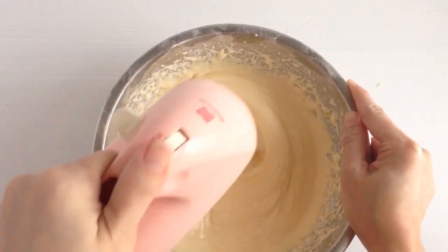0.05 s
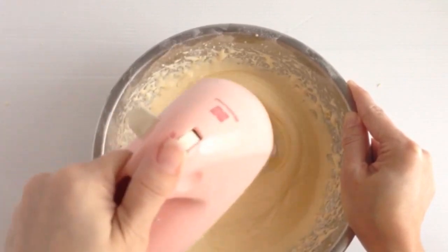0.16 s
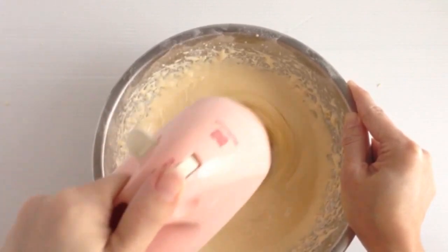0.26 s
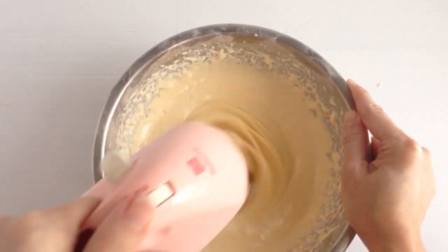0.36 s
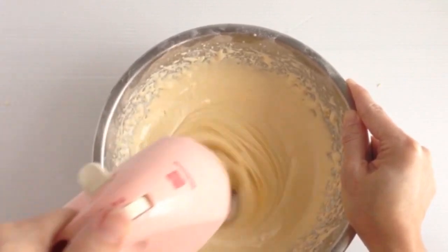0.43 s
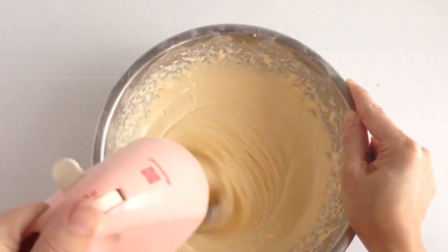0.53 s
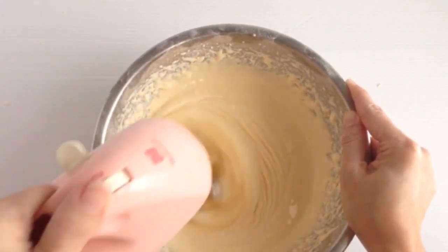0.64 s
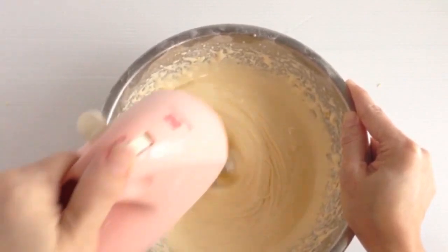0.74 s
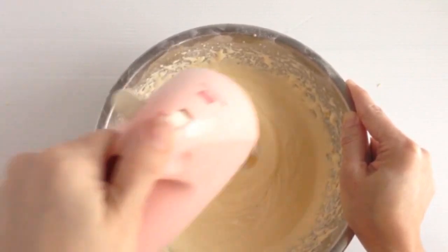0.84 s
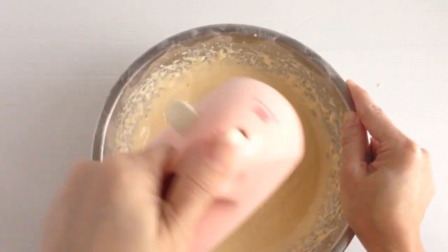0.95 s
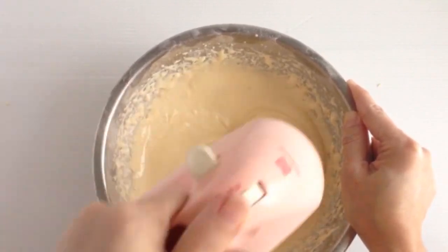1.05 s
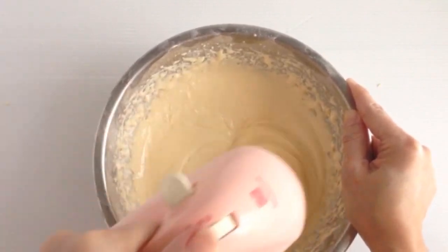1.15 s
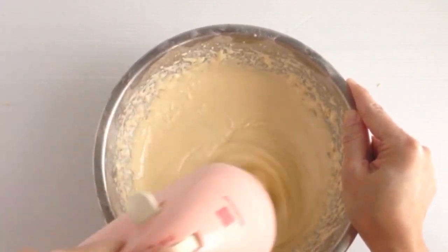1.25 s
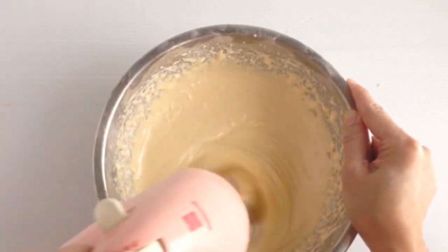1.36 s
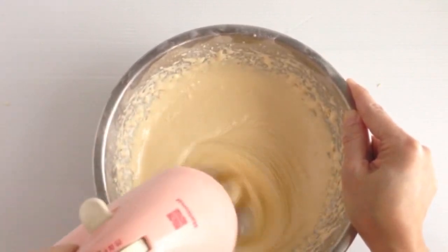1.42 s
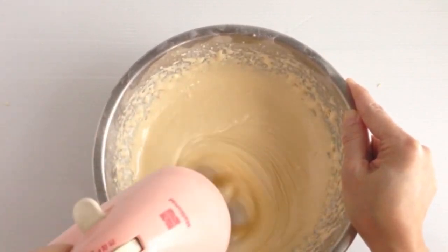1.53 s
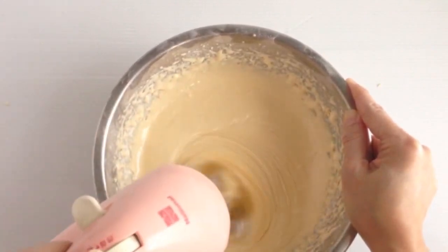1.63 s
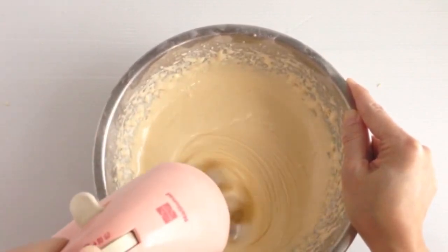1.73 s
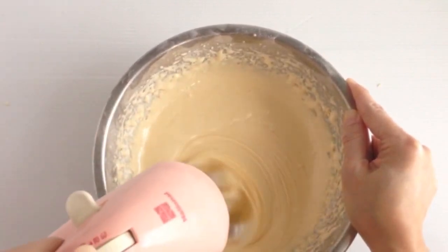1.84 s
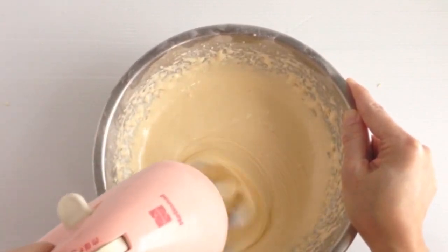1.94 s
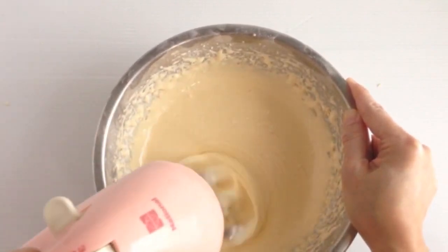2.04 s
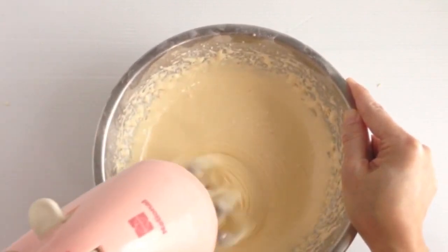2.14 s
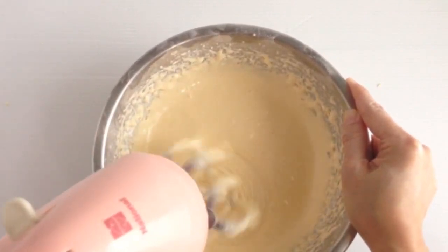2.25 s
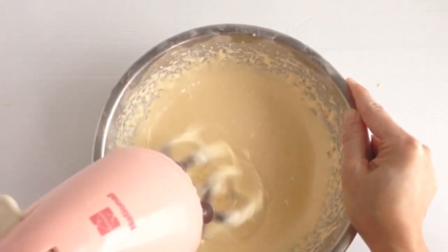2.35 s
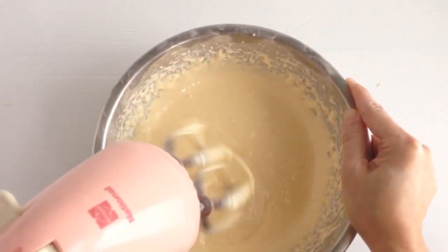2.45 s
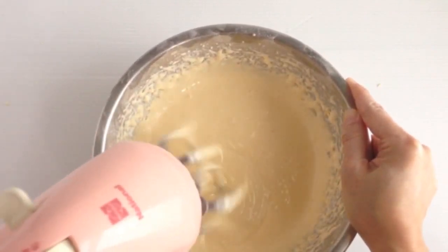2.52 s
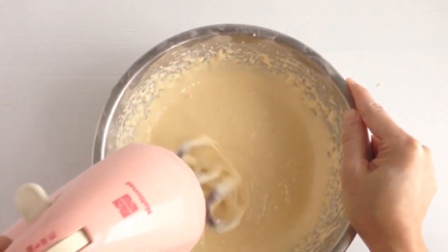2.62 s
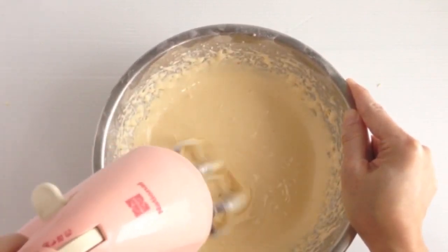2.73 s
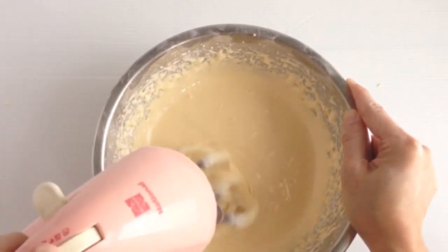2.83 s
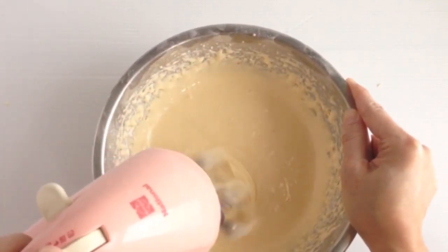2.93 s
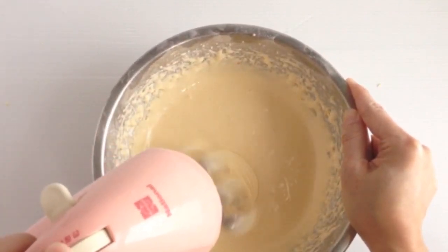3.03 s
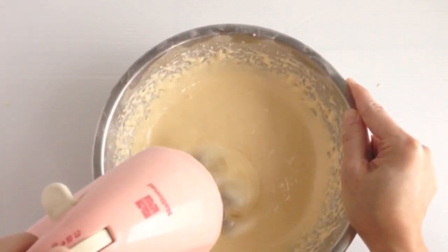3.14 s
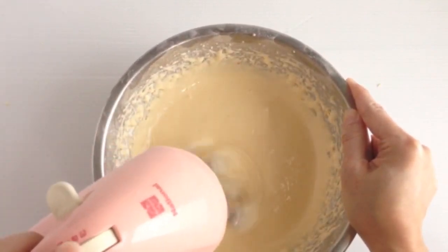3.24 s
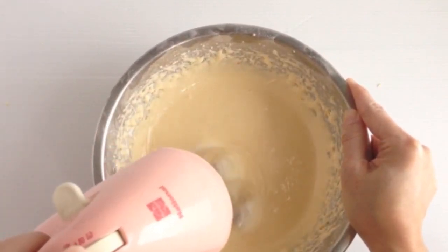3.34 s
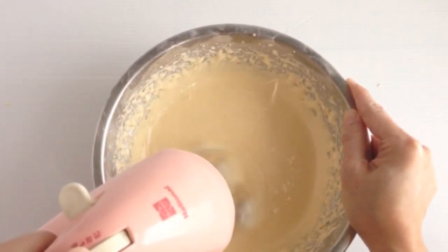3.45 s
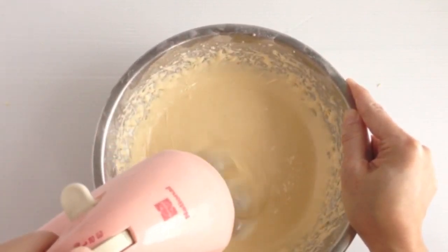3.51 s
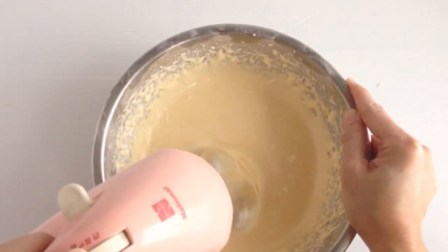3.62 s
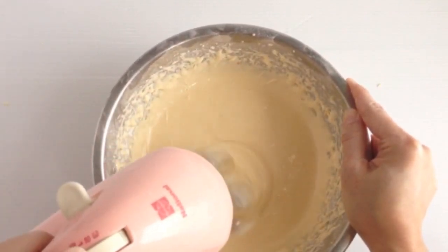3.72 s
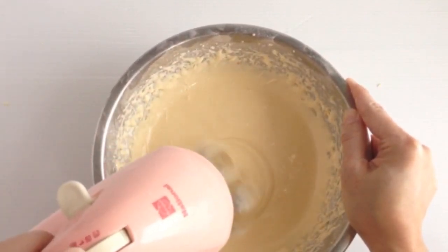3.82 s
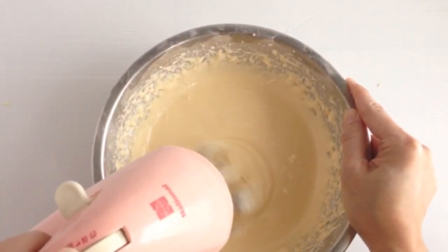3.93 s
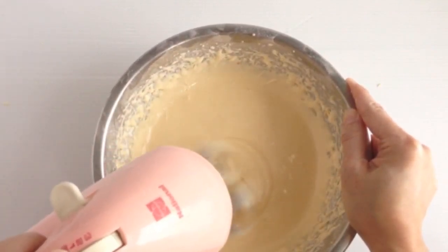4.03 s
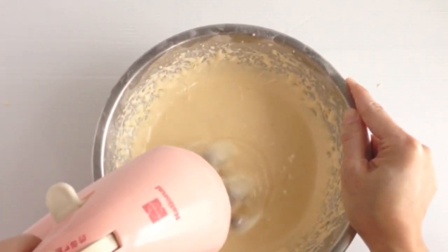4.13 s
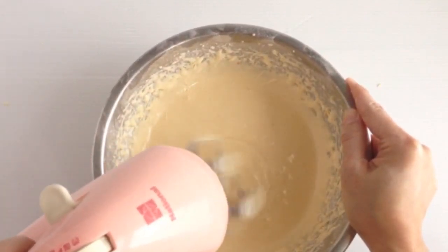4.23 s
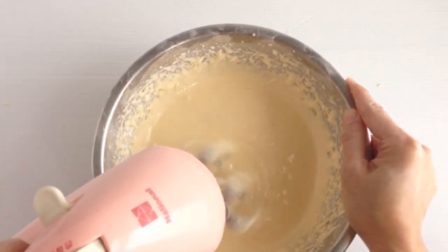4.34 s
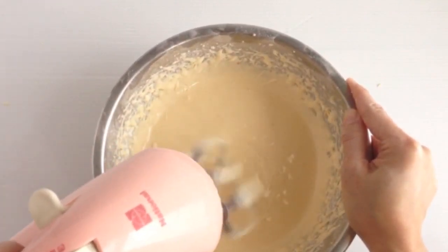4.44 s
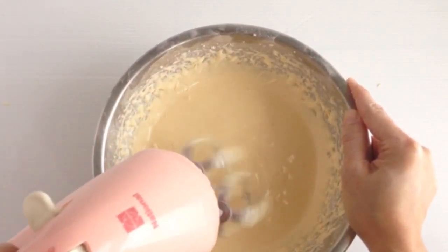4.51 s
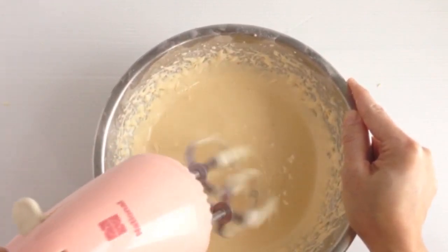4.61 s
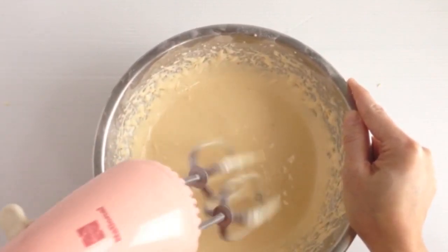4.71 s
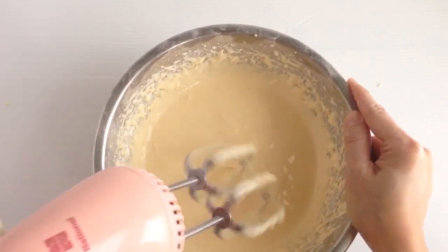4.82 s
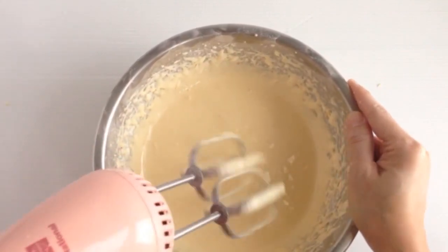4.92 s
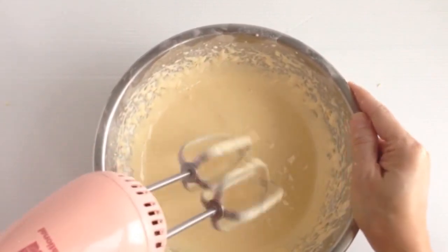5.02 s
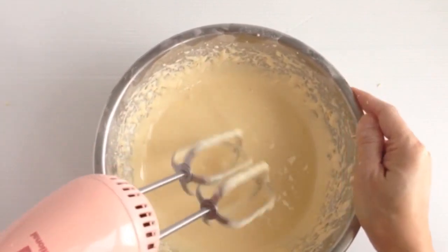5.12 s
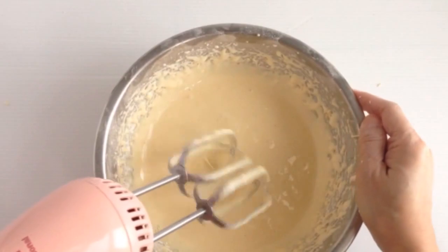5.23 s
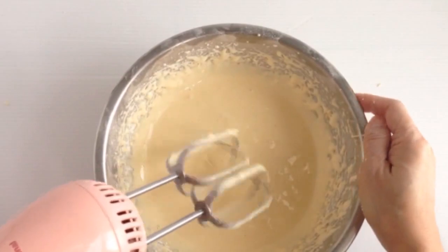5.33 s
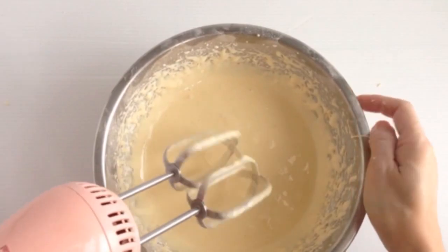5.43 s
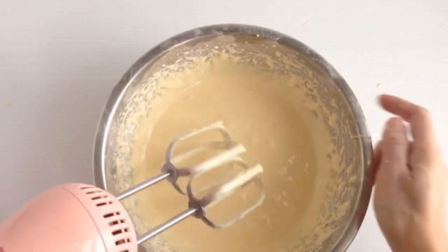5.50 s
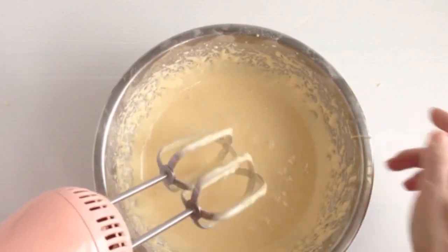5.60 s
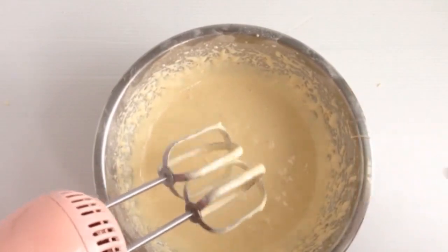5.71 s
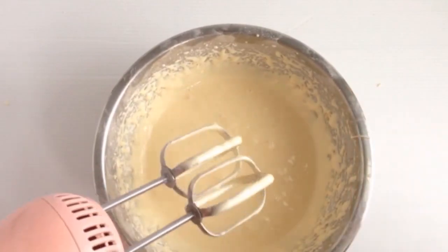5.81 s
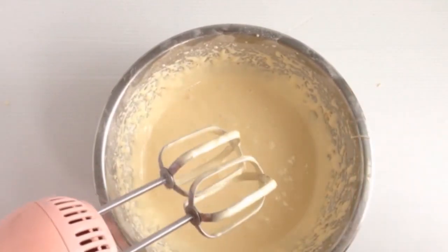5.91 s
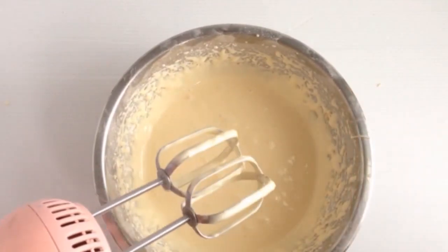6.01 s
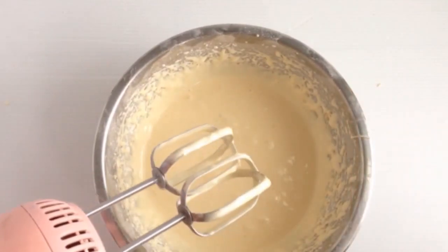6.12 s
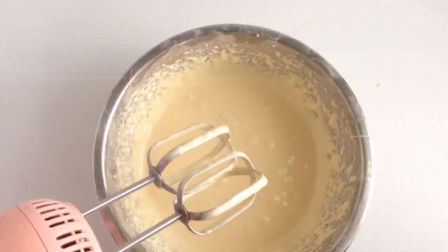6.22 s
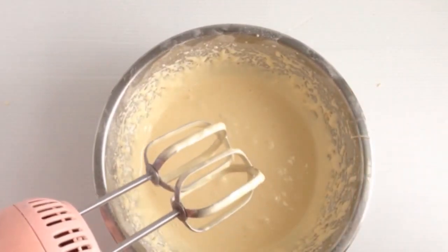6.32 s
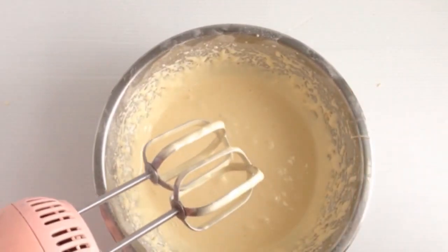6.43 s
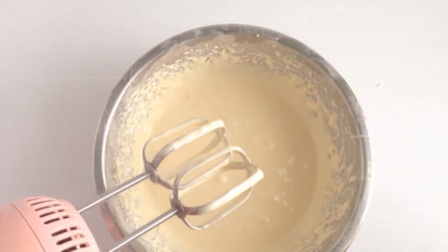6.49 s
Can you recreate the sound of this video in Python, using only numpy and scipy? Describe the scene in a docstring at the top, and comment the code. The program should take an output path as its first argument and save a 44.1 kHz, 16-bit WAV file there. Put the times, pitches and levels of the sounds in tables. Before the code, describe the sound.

A small electric hand mixer is heard close up in a quiet kitchen, running at full speed from the start: a buzzing, whining motor with gear rattle and brush crackle, batter slapping softly. Beaters knock the steel bowl in short damped thuds with metal ticks, briefly around 0.2 s, in a flurry from 0.65 to 1.0, then rapidly and regularly from 1.15 to 1.85, with short scraping drags. At about 1.55 a sharp switch snap cuts the power; the whine flares and slides downward while the knocks continue. Near 2.95, after faint slider clicks, the motor grunts and snarls up again in a half-second burst. A second snap at 3.5 starts the long run-down, pitch falling through buzz and dry rubbing. From about 4.5 a thin hiss and sinking whistle emerge, fading by 6 s, leaving low room tone until 6.7.

```python
"""A whining, buzzing electric hand mixer, close to the microphone in a quiet kitchen, beats batter in a steel bowl.
Repeating bumps of the rotor make the buzz and its slots the whine; gears, bearings and brushes are shaped noise.
Beaters knock and drag on the batter-damped bowl: sinking tones with metal ticks, and narrow bands of noise.
The switch snaps off and the rotor coasts down; a short second burst, another snap, and it runs down to rest.
As it slows, a thin hiss and a falling whistle come out of the vents over the low room tone."""
import sys
import numpy as np
from scipy import signal
from scipy.fft import rfft, irfft, next_fast_len
from scipy.io import wavfile
from scipy.ndimage import uniform_filter1d

SR = 44100
rng = np.random.default_rng(int(sys.argv[2]) if len(sys.argv) > 2 else 0)


def materialize(psi):
    """Save the field psi as 16-bit PCM at rate SR to the path in sys.argv[1].

    A 1-D psi becomes a single channel; in a 2-D psi each row is a channel.
    """
    bounded = np.clip(np.atleast_2d(psi).T, -1, 1)
    quanta = np.round(bounded * 32767).astype(np.int16)
    wavfile.write(sys.argv[1], SR, quanta)


N = 289291
TIME = np.arange(N) / SR
MAINS_HZ = 50
WORKING_SPEED, CRITICAL_SPEED = 194, 151.6   # turns per s; the whine flares at the critical speed

# when current flows through the motor: on_s, off_s
POWERED_SPANS = [(0, 1.55), (2.937, 3.49)]
# how deep the beaters sit in the batter: time_s, depth (0-1)
BEATER_DEPTH = [(0, 0.487), (0.2, 0.522), (0.7, 0.771), (1.2, 0.452), (1.55, 0.657), (1.7, 1.0), (1.8, 1.0),
                (2.25, 0.0), (2.95, 0.0), (3.55, 0.211), (4.1, 0.0)]
# resonances of the plastic housing: centre_hz, width_hz, level_db (against the broad response)
HOUSING_MODES = [(466, 37, 5.5), (723, 63, 9), (1070, 370, 13.5), (1560, 220, 8), (1756, 130, 15),
                 (1896, 56, 12.5), (2153, 52, 13), (2342, 80, 10.5), (2660, 260, -4), (3216, 560, 8),
                 (3620, 28, 7.5), (4320, 260, 5), (4705, 96, 11), (5080, 130, 10.5), (5470, 99, 9.5),
                 (6670, 340, -1.5)]
# beaters knocking on the bowl, ringing in deep batter and dry against the wall: start_s, thud_peak_db (before
# the bass cut), thud_hz (about where its sinking pitch settles), thud_t60_s, tick_db
BOWL_KNOCKS = [(0.197, -12, 357, .024, -21.5), (0.224, -16.5, 367, .018, -31),
               (0.242, -10.5, 357, .024, -27), (0.660, -15, 410, .024, -31), (0.682, -9.5, 428, .032, -32),
               (0.704, -9.5, 423, .032, -21), (0.730, -12.5, 408, .032, -30), (0.75, -8, 400, .032, -30),
               (0.801, -13, 377, .022, -23), (0.846, -8.5, 371, .022, -25), (0.890, -9.5, 372, .036, -20.5),
               (0.916, -13.5, 377, .034, -26), (0.935, -9, 369, .038, -22), (0.961, -23, 358, .03, -28),
               (0.981, -11.5, 344, 0.023, -22), (1.133, -19.5, 430, .007, -26),
               (1.185, -20, 415, .007, -20.5), (1.211, -23, 415, .007, -25.5), (1.238, -15, 680, .006, -23),
               (1.266, -16, 590, .005, -22.5), (1.289, -13, 540, .005, -18),
               (1.318, -13.5, 484, .005, -18.5), (1.342, -12, 540, .005, -18.5),
               (1.369, -13.5, 400, .005, -21.5), (1.392, -8.5, 460, .005, -16.5),
               (1.420, -14, 396, .006, -24), (1.445, -7.5, 435, .005, -17), (1.472, -12, 400, .005, -20),
               (1.495, -6, 455, .005, -17), (1.523, -10, 407, .006, -27), (1.545, -6, 407, .006, -25.5),
               (1.576, -20.5, 400, .005, -32), (1.599, -9.5, 444, .0055, -26),
               (1.626, -11.5, 404, .006, -31), (1.651, -8, 420, .006, -22), (1.681, -14, 408, .006, -31),
               (1.708, -8.5, 450, .0065, -23), (1.739, -14.5, 400, .006, -28), (1.765, -14, 460, .007, -28),
               (1.798, -16, 467, .007, -35), (1.827, -14.5, 460, .007, -23)]


def from_db(db):
    """Decibels to gain."""
    return 10 ** (np.asarray(db) / 20)


def rms_one(x):
    """Scale to rms 1."""
    return x / np.sqrt(np.mean(x ** 2) + 1e-20)


def in_time(rows):
    """Each column of a curve, at every sample."""
    s, *columns = np.transpose(rows)
    return [np.interp(TIME, s, column) for column in columns]


def drift(rate):
    """Smooth chance of spread 1, heading for a new random value this many times a second."""
    knots = rng.standard_normal(16 * 1024)
    return rms_one(np.interp(TIME * rate, np.arange(len(knots)), knots))


def colour(x, spectrum, resonances=()):
    """Shape a sound by a broad spectrum with resonances on top; rms 1."""
    size = next_fast_len(len(x) + 2048)
    hz = np.arange(size // 2 + 1) * SR / size + 1e-3
    points = np.array(spectrum)
    level = np.interp(np.log(hz), np.log(points[:, 0]), points[:, 1])
    level -= 18 * np.maximum(np.log2(points[0, 0] / hz), 0)   # 18 dB per octave below the first point
    for centre, width, db in resonances:
        level += db / (1 + (2 * (hz - centre) / width) ** 2)
    return rms_one(irfft(rfft(x, size) * from_db(level), size)[:len(x)])


def grains(rough_db, rate):
    """Noise made of tiny contacts of uneven strength."""
    return rng.standard_normal(N) * from_db(rough_db * drift(rate))


def add(track, s, sound):
    """Mix a short sound in at a time."""
    start = int(s * SR)
    track[start:start + len(sound)] += sound[:N - start]


def loudness(part, speed, torque):
    """Gain of a part's noise: it grows with speed and changes with the torque passing through it."""
    coasting_db, speed_power, torque_db = part
    torque_power = 0.91
    return from_db(coasting_db + torque_db * torque ** torque_power) * (speed / WORKING_SPEED) ** speed_power


def rotor():
    """The motor pulls towards its free speed, friction and batter hold it back; current makes the torque ripple."""
    free_speed, pull_s = 232.4, .281   # turns per s, time constant
    friction_turns_per_s2, batter_drag_per_s = 70.1, .582   # drag at full depth
    depth, = in_time(BEATER_DEPTH)
    current_on = sum(1.0 * (TIME >= on) * (TIME < off) for on, off in POWERED_SPANS)
    power = uniform_filter1d(current_on, size=256)

    step, speeds = 44, [WORKING_SPEED]   # step in samples
    for current, dipped in zip(power[::step], depth[::step]):
        now = speeds[-1]
        pull = current * (free_speed - now) / pull_s
        change = pull - friction_turns_per_s2 - batter_drag_per_s * dipped * now
        speeds.append(max(now + change * step / SR, 0))
    speed = np.interp(np.arange(N) / step, np.arange(len(speeds)), speeds) * (1 + .002 * drift(40))
    angle = 2 * np.pi * np.cumsum(speed) / SR

    # 1 at working speed, more while speeding up
    torque = np.abs(power * (free_speed - speed) / (free_speed - WORKING_SPEED))
    # two pulses per mains cycle, one of them stronger
    pulses = 0.84 * np.cos(4 * np.pi * MAINS_HZ * TIME)
    unevenness = 0.38 * np.cos(2 * np.pi * MAINS_HZ * TIME)
    return speed, angle, torque, power * (pulses + unevenness)


def buzz(speed, angle, torque):
    """Each turn repeats the same small bumps: a comb of orders that sweeps through the housing resonances."""
    # rotor orders that stand out: order (multiple of the speed), level_db (added to the trend)
    strong_orders = [(3, -4), (4, -1), (5, -4), (6, -2), (7, 3), (8, 4), (10, 5), (11, 1), (12, -8),
                     (13, -2), (16, 5), (17, -4), (20, 8), (21, 2), (23, 2), (24, 4), (28, 2), (36, 8),
                     (44, 2), (48, 3), (60, 6), (65, 4), (70, 5), (72, 7)]
    # high orders are weaker and more broken, but hold on as the rotor slows:
    # order (multiple of the speed), level_db, flicker_db, share of the slow lift
    order_trend = [(7, -.5, 2.5, .55), (12, -.5, 2.5, .4), (21, .5, 3, .55), (30, -2, 3.5, .6),
                   (40, -4.5, 4, 1.1), (58, -6, 4, 1.4), (73, -5, 4, 1.3)]
    # response of the housing to the comb: frequency_hz, level_db
    buzz_spectrum = [(300, -9), (420, 1), (490, 10.5), (600, -3), (720, 10.5), (870, -8), (1120, 14.5),
                     (1300, 0), (1600, -1), (1750, 14), (1900, 14), (2150, 8), (2800, -4), (3300, 3),
                     (3800, -3), (4400, 5), (5100, -2), (5500, 1), (6100, -5), (6800, -3), (8000, -8),
                     (9400, -11), (11000, -20)]
    free_shake_rad, batter_shake_rad = .005, .04   # the second is added at full depth
    buzz_level = (-27.3, 2.6, -8)   # dB coasting at working speed, power of the speed, dB by working torque

    depth, = in_time(BEATER_DEPTH)
    strong, comb = dict(strong_orders), np.zeros(N)
    # play in the bearings shakes the angle; batter on the blades shakes it more, the high orders most
    shaken = angle + .008 * drift(35) + (free_shake_rad + batter_shake_rad * depth) * drift(260)
    shaken = (shaken % (2 * np.pi)).astype(np.float32)
    slow_lift_db = 7 * (1 - speed / CRITICAL_SPEED)   # 0 at the critical speed, 7 at rest
    trend_orders, *trend_columns = np.transpose(order_trend)
    for order in range(2, 74):
        db, flicker_db, lift = (np.interp(order, trend_orders, column) for column in trend_columns)
        waver = from_db(flicker_db * drift(22) + lift * slow_lift_db)
        tone = np.sin(order * shaken + rng.uniform(0, 2 * np.pi))
        comb += from_db(db + strong.get(order, 0)) * waver * tone
    # under load the gears chatter and the clean lines weaken
    return loudness(buzz_level, speed, torque) * colour(comb, buzz_spectrum)


def whine(speed, angle, torque):
    """The twelve armature slots sing near the housing's main resonance, with side tones while current flows."""
    # the whine swells and fades: time_s, level_db
    whine_swell = [(0, 1.5), (.13, 0), (.27, 5.5), (.45, 1.5), (.62, -1), (.78, -3), (.92, 1.5), (1.08, 3),
                   (1.28, -6), (1.5, 1), (1.65, -8), (1.84, 8.5), (2, -6), (3.1, -1), (3.17, 6),
                   (3.26, -0.5), (3.35, -0.5), (3.45, -1.5), (3.6, -4.5), (3.85, 4), (4, 4), (4.1, -2)]
    # torque ripple puts side tones round the whine: offset (ripple cycles), level_db
    side_tones = [(-2, -1.5), (-1, -1), (0, 0), (1, -6), (2, -12)]
    # dB coasting at working speed, power of the speed, dB added by working torque
    whine_level = (-43.5, 1.8, 2.33)
    radiation = [(900, -22), (1500, -11), (1750, 0), (1950, -1), (2080, -3), (2250, 0), (2350, 0), (2600, -6)]
    flare_peak_db, flare_width = 11.5, 25.7   # width in turns per s

    swell_db, = in_time(whine_swell)
    flare_db = flare_peak_db / (1 + ((speed - CRITICAL_SPEED) / flare_width) ** 2)
    side_gain = torque * (speed / WORKING_SPEED) ** 6.5
    load = np.minimum(torque, 1)
    slots = 12 * angle + .25 * load * drift(120) + (.6 + .3 * load) * drift(16)
    tones = np.zeros(N)
    for offset, db in side_tones:
        gain = from_db(db + 2.8 * drift(18)) * (side_gain if offset else 1)
        tones += gain * np.sin(slots + offset * (4 * np.pi * MAINS_HZ * TIME + offset))
    return loudness(whine_level, speed, torque) * from_db(flare_db + swell_db) * colour(tones, radiation)


def friction(speed, angle, torque, ripple):
    """Gears rattle once per beater blade, bearings rub each turn, brushes crackle with the current."""
    # broad noise spectra of the three parts: frequency_hz, level_db (per Hz)
    gear_spectrum = [(120, -24), (350, -3), (600, 4.5), (880, -5), (1300, 0), (2000, -2), (2700, -7),
                     (4000, 1.5), (8000, -20.5)]
    bearing_spectrum = [(1200, -22.5), (1900, -1.5), (2400, 6.5), (2800, 5.5), (3400, 1), (5000, -3.5),
                        (7000, 0.5), (9000, -37.5), (12000, -43.5)]
    brush_spectrum = [(3000, -0.5), (7000, 2.5), (9000, -2), (10800, -8.5), (12500, -6), (15000, -12)]
    # level of each part: dB coasting at working speed, power of the speed, dB added by working torque
    gear_level = (-33, 1.67, 1.27)
    bearing_level = (-36, 2.2, 2.2)
    brush_level = (-42, 2.8, 0.84)

    blades = 1 + .17 * np.sin(angle / 5)
    gears = colour(grains(1.9, 350) * blades * (1 + 0.061 * ripple), gear_spectrum, HOUSING_MODES)
    turning = 1 + 0.062 * np.sin(angle)
    bearings = colour(grains(0.9, 550) * blades * turning, bearing_spectrum, HOUSING_MODES)
    brushes = colour(grains(0.92, 900) * (1 + 0.17 * ripple), brush_spectrum)
    parts = (gear_level, gears), (bearing_level, bearings), (brush_level, brushes)
    return sum(loudness(level, speed, torque) * sound for level, sound in parts)


def housing_ring(speed, angle):
    """Gear teeth tap across their backlash once per beater blade and ring the housing near its main modes."""
    # band in which the taps ring: frequency_hz, level_db (per Hz)
    ring_band = [(1450, -24), (1750, -12), (1950, 4.5), (2300, -11), (2700, 0), (4000, -57)]
    even_speed = 65   # turns per s: taps are even well above it and fade below
    gain = from_db(-44) * np.tanh((speed / even_speed) ** 5.2)
    taps = 1 + .17 * np.sin(angle / 5)
    return gain * colour(grains(3.7, 150) * taps, ring_band, HOUSING_MODES)


def shaft_rub(speed):
    """The dry shaft rubs brightly, hardly depending on speed until the rotor is nearly at rest."""
    # broad spectrum of the rub: frequency_hz, level_db (per Hz)
    rub_spectrum = [(1000, -5), (1500, -7.5), (2800, -8), (3300, -9), (5000, -4), (7200, -6), (9000, -6.5),
                    (10800, -12), (12500, -8), (15000, -13.5)]
    # resonances on top of it: centre_hz, width_hz, level_db
    rub_resonances = [(1090, 160, 12), (2410, 300, 11.5), (3420, 200, 13), (4290, 300, 12), (4700, 200, 6),
                      (6130, 400, 1.5), (7150, 300, 2)]
    fade_speed = 33.4   # turns per s
    gain = from_db(-49.5) * np.tanh((speed / fade_speed) ** 1.1)
    return gain * colour(grains(1.6, 220), rub_spectrum, rub_resonances)


def batter(speed, angle):
    """Thick batter slaps softly as the blades pass through it, and louder where they run against the bowl."""
    # spectrum of the slaps: frequency_hz, level_db (per Hz)
    slap_spectrum = [(50, -33), (110, -2.5), (170, 0), (260, 0.5), (400, 8.5), (720, -1), (1000, -5.5),
                     (2500, -29.5)]
    stir_db, wall_db, approach_s = -38, -35.5, 0.087   # stir_db at full depth and working speed

    depth, = in_time(BEATER_DEPTH)
    touching = 1.0 * np.any([np.abs(TIME - s) < .015 for s, *_ in BOWL_KNOCKS], axis=0)
    near_wall = np.sqrt(np.abs(uniform_filter1d(touching, size=int(approach_s * SR))))
    stirring = from_db(stir_db) * depth * (speed / WORKING_SPEED) ** 5.4
    squeezing = from_db(wall_db) * near_wall   # batter caught between the blades and the bowl
    blades = 1 + .4 * np.sin(angle / 5)
    return (stirring + squeezing) * colour(grains(1.5, 150) * blades, slap_spectrum)


def room_tone():
    """The quiet kitchen's own uneven low noise, with a faint mains hum."""
    # spectrum of the empty room: frequency_hz, level_db (per Hz)
    room_spectrum = [(15, -47.5), (25, -27), (45, -1), (93, -5.5), (158, 0), (191, -8.5), (231, -9),
                     (271, -8), (326, -6), (515, -16), (558, -24), (604, -17), (879, -20), (978, -22.5),
                     (15000, -38)]
    hum = from_db(-63.0) * np.sin(2 * np.pi * MAINS_HZ * TIME)
    return from_db(-52) * colour(grains(0.92, 11), room_spectrum) + hum


def knocks():
    """Each blow gives a few sinking cycles of the damped bowl and a brief metal tick."""
    # spectrum of the metal tick: frequency_hz, level_db (per Hz)
    tick_spectrum = [(250, -7.5), (650, 12), (1000, 1.5), (1500, 3.5), (3500, -4.5), (7000, -15),
                     (15000, -26)]
    sag, sag_s = 0.14, 0.00036   # the pitch sinks by this share of thud_hz, with this time constant
    base_hz, base_db = 238.6, -16   # the bowl's lowest mode, against the thud

    out, t = np.zeros(N), TIME[:SR // 12]
    for s, db, hz, t60, tick_db in BOWL_KNOCKS:
        swell = (1 - np.exp(-t / 0.0019)) ** 3 * from_db(-60 * t / t60)
        pitch = hz * (1.15 - sag * (1 - np.exp(-t / sag_s)))
        base = from_db(base_db) * np.sin(2 * np.pi * base_hz * t)
        # both modes die together in the batter
        thud = swell * (base - np.sin(2 * np.pi * np.cumsum(pitch) / SR))
        tick = from_db(tick_db) * colour(rng.standard_normal(len(t)), tick_spectrum) * from_db(-60 * t / 0.041)
        add(out, s, from_db(db) * thud / np.abs(thud).max() + tick)
    # a small bowl radiates little bass
    return signal.sosfilt(signal.butter(2, 160, "high", fs=SR, output="sos"), out + 1e-18)


def drags():
    """A blade dragging on the steel draws out one mode of the bowl for a moment."""
    # each drag: start_s, length_s, mode_hz, level_db
    blade_drags = [(0.21, 0.19, 760, -37), (0.52, 0.055, 1850, -32.5), (0.98, 0.1, 790, -39.5),
                   (1.12, 0.12, 165, -40), (1.27, 0.087, 1570, -35)]
    width_hz = 87
    out = np.zeros(N)
    for s, length, hz, db in blade_drags:
        edges = [hz - width_hz / 2, hz + width_hz / 2]
        band = signal.butter(2, edges, "band", fs=SR, output="sos")
        ring = signal.sosfilt(band, rng.standard_normal(SR // 2))[-int(length * SR):]
        add(out, s, from_db(db) * rms_one(ring * signal.windows.tukey(len(ring))))
    return out


def switch():
    """The slider scrapes over its detent in a tight burst that dies quickly in the plastic."""
    # the slide switch moves: start_s, level_db, rise_s, scrape_s
    switch_moves = [(1.5427, -11.5, 0.002, 0.0033), (2.831, -47, 0.0011, .002),
                    (2.939, -40, 0.0009, 0.0034), (3.485, -16, 0.0059, 0.0015)]
    # spectrum of the burst: frequency_hz, level_db (per Hz)
    snap_spectrum = [(300, -21.5), (1000, -2.5), (1900, -23), (2400, 0.5), (3300, 2), (4500, -5),
                     (7500, -11), (11000, -16.5), (15000, -20.5)]
    out, t = np.zeros(N), TIME[:SR // 12]
    for s, db, rise, scrape in switch_moves:
        shape = np.minimum(t / rise, 1) * from_db(-60 * np.maximum(t - rise - scrape, 0) / 0.061)
        add(out, s, from_db(db) * shape * colour(rng.standard_normal(len(t)), snap_spectrum))
    return out


def kitchen(x, t60, wet_db):
    """Dense, short reflections from the bowl, worktop and walls."""
    t = TIME[:SR // 2]
    tail = rng.standard_normal(len(t)) * from_db(-60 * t / t60) * (t > .003)
    return x + from_db(wet_db) * signal.fftconvolve(x, tail / np.sqrt(np.sum(tail ** 2)))[:N]


def jolt(speed, torque, ripple):
    """At switch-on the gears take up their slack with a grunt, then snarl brightly as the rotor gathers speed."""
    # spectra of the grunt and the snarl: frequency_hz, level_db (per Hz)
    grunt_spectrum = [(350, -1), (600, 4), (850, 5.5), (1100, 15.5), (1900, -6), (3000, -26)]
    snarl_spectrum = [(400, -0.5), (800, -9), (1100, 16), (1400, -9), (1900, 16), (2250, 4), (2700, -19),
                      (3300, -20), (3900, -10), (4500, 3), (5200, -25), (6500, -9.5), (8000, -22),
                      (15000, -24)]
    rise_s, t60_s = .0017, 0.5   # of the grunt

    since = np.maximum(TIME - POWERED_SPANS[1][0], 0)
    grunt_gain = from_db(-36.5) * np.minimum(since / rise_s, 1) * from_db(-60 * since / t60_s)
    overload = np.tanh(2 * np.maximum(torque - 1, 0))   # only above working torque
    snarl_gain = from_db(-26) * overload * (speed / WORKING_SPEED) ** 4.8
    grunt = grunt_gain * colour(rng.standard_normal(N), grunt_spectrum)
    snarl = snarl_gain * colour(grains(1.5, 300), snarl_spectrum)
    return (1 + 0.31 * ripple) * (grunt + snarl)


def windup(angle, torque):
    """The starting current makes the twelve armature slots growl in a rough, rising sweep."""
    surge = np.tanh(np.maximum(torque - 2, 0))   # only above twice the working torque
    return from_db(-41 + 3 * drift(100)) * surge * np.sin(12 * angle + .8 * drift(150))


def vent_hiss(angle):
    """Thin brush hiss and a falling whistle escape from the vents as the mixer is lifted out of the bowl."""
    # the mixer is tipped back and its vents face the listener: time_s, hiss_level_db
    vent_levels = [(4.4, -69), (4.9, -54.5), (5.15, -53), (5.5, -57), (5.95, -68.5), (6.2, -84)]
    # spectrum of the hiss: frequency_hz, level_db (per Hz)
    hiss_spectrum = [(3000, -7), (5200, -1), (6300, 6.5), (7200, 3.5), (8700, -8), (10700, -10),
                     (12000, -2), (15000, -6)]
    whistle_db = -8.5   # against the hiss
    whistle_response = [(1500, -20), (2100, -8), (2380, 0), (2700, -8), (4000, -16)]

    level_db, = in_time(vent_levels)
    whistle = colour(np.sin(36 * angle + .6 * drift(80)), whistle_response)
    return from_db(level_db) * (colour(grains(1.0, 900), hiss_spectrum) + from_db(whistle_db) * whistle)


def scene():
    """Motor, batter and blows over the room's own low hum."""
    speed, angle, torque, ripple = rotor()
    tones = buzz(speed, angle, torque) + whine(speed, angle, torque) + windup(angle, torque)
    rattle = friction(speed, angle, torque, ripple) + housing_ring(speed, angle)
    rattle += shaft_rub(speed) + jolt(speed, torque, ripple)
    hits = kitchen(knocks() + drags() + switch(), t60=0.22, wet_db=-14.5)
    return (tones + rattle + vent_hiss(angle) + batter(speed, angle) + hits + room_tone())[None]


def record(dry):
    """The microphone drops the deepest bass and rounds the highest peaks; the top is cut steeply."""
    thin = signal.sosfilt(signal.butter(4, 42, "high", fs=SR, output="sos"), dry)
    rounded = thin / (1 + (thin / .9) ** 4) ** .25
    return signal.sosfilt(signal.ellip(12, .1, 80, 15400, fs=SR, output="sos"), rounded)


dry = scene()
out = record(dry)
materialize(out)
```